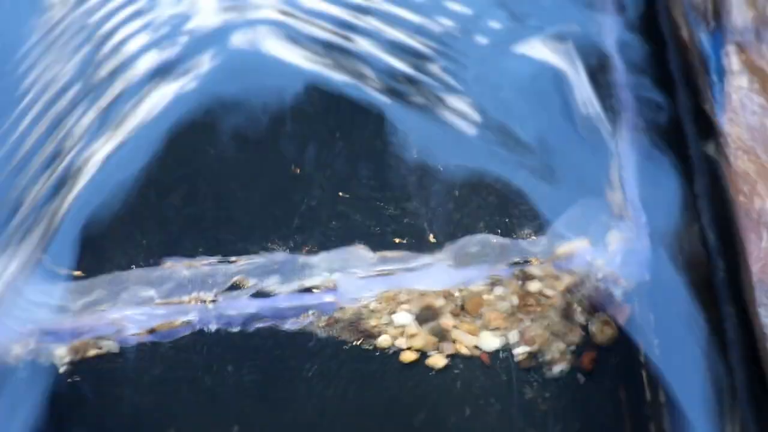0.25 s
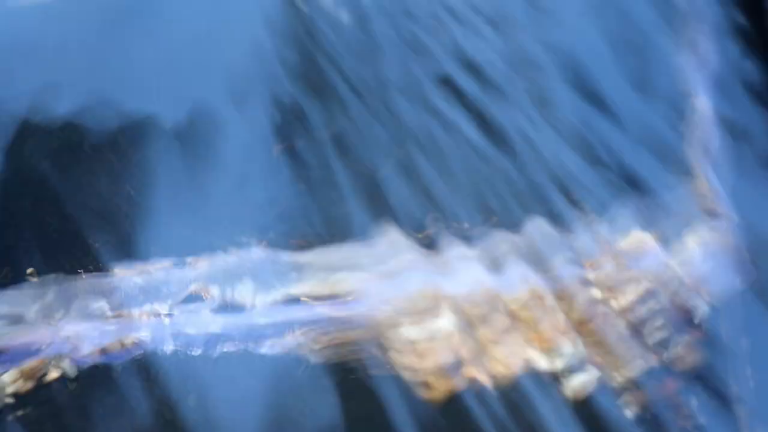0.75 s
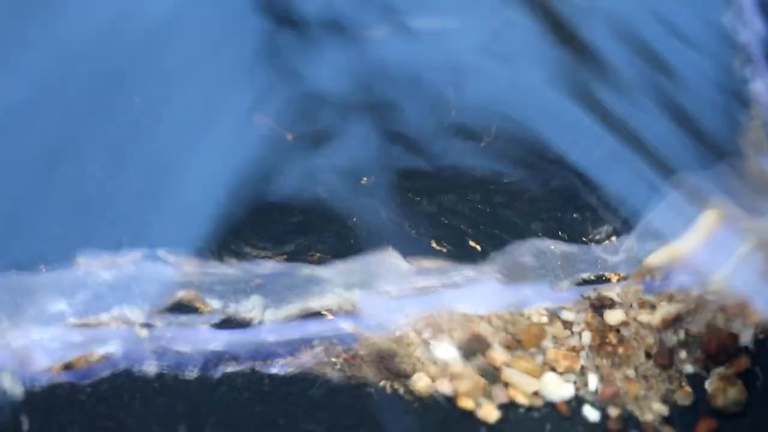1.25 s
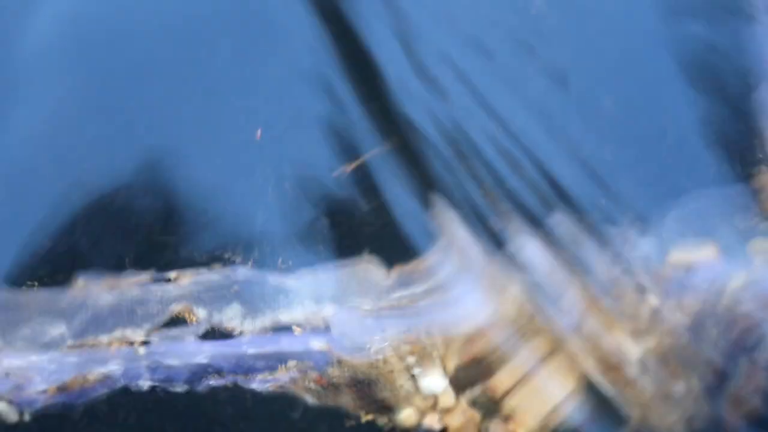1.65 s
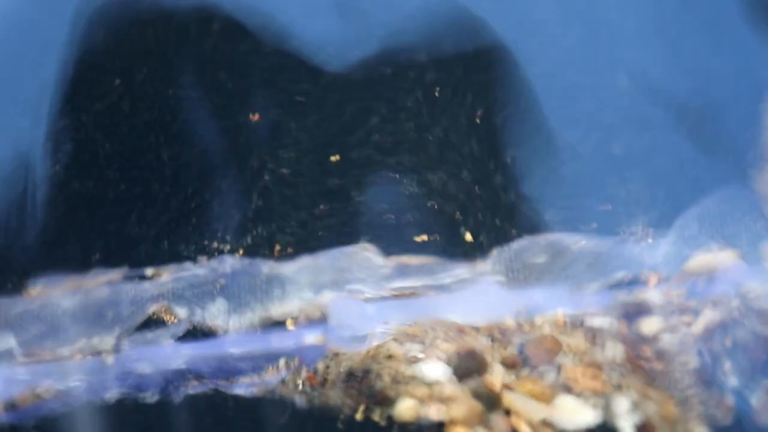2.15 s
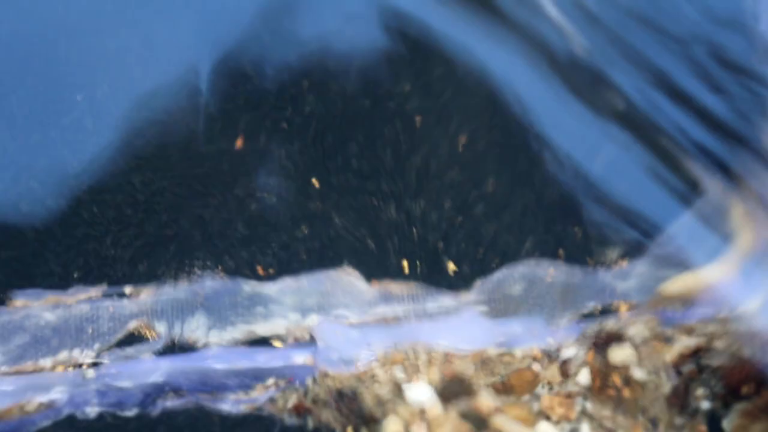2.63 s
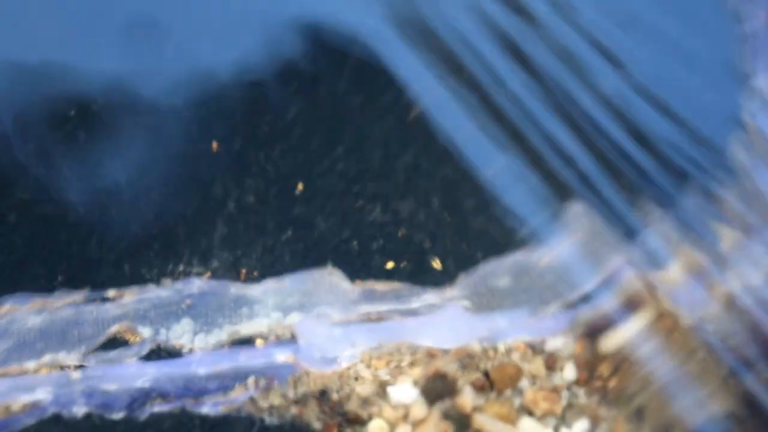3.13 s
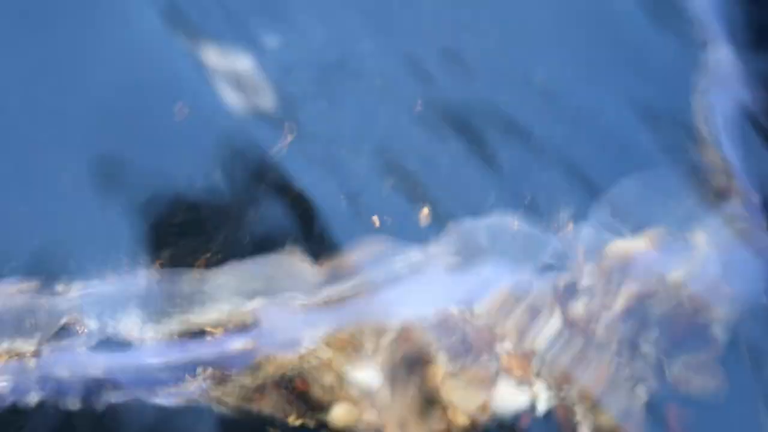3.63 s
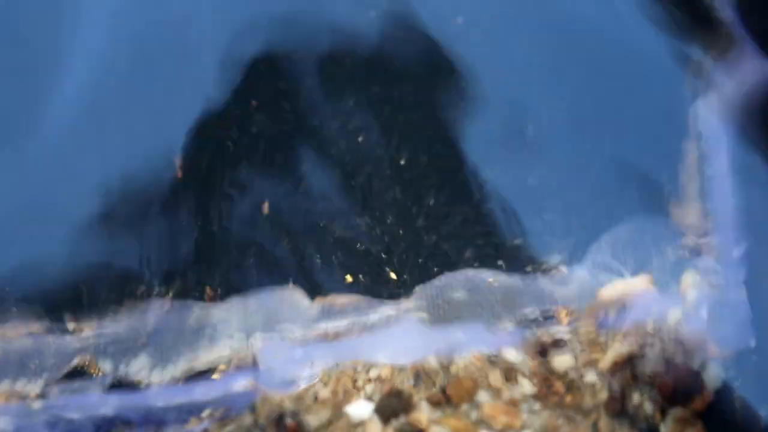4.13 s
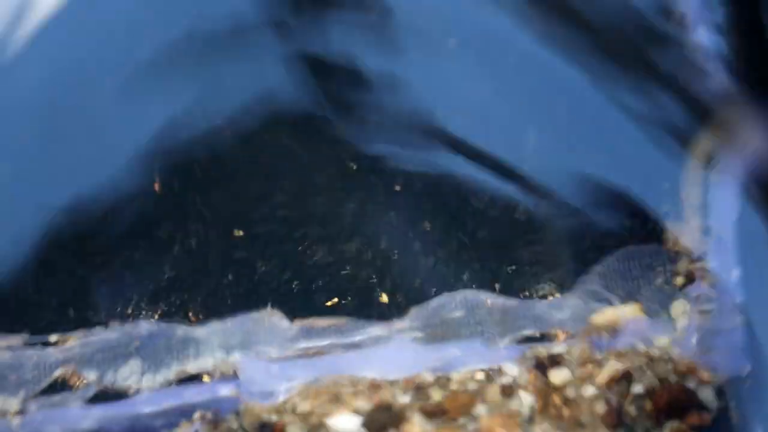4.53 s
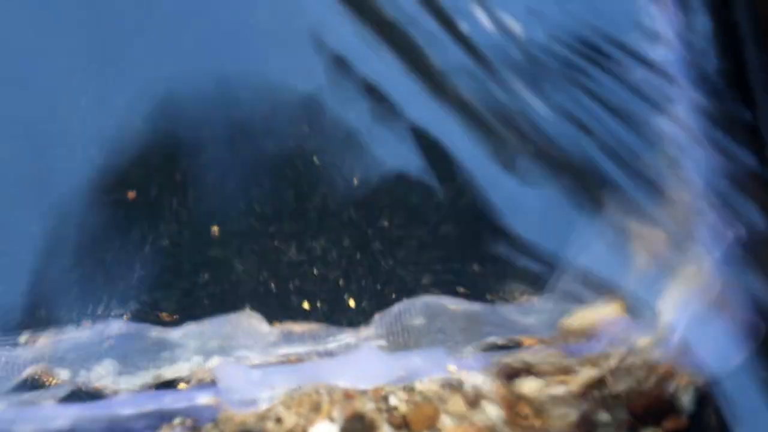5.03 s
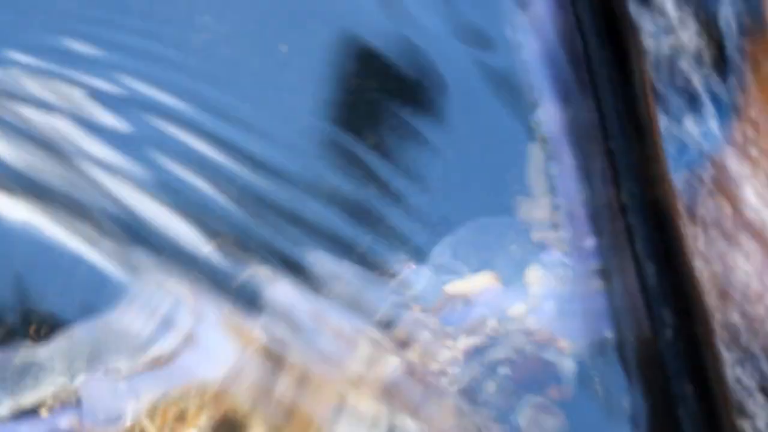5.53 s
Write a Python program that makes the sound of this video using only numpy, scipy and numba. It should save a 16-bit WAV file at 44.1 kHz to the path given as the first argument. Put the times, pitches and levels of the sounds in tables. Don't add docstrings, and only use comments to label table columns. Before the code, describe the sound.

Close, steady gurgling rush of river water through a sluice box, crowded with plinking bubbles, fizz and droplet ticks over soft hiss.

```python
import sys
import numpy as np
from scipy import signal
from scipy.fft import rfft, irfft, next_fast_len
from scipy.io import wavfile
from scipy.ndimage import uniform_filter1d, map_coordinates
from numba import njit

SR = 44100
rng = np.random.default_rng(int(sys.argv[2]) if len(sys.argv) > 2 else 0)


def pcm_store(signal):
    levels = np.round(np.clip(np.atleast_2d(signal), -1, 1) * 32767)
    wavfile.write(sys.argv[1], SR, levels.astype(np.int16).T)


def natural_amplitude(level_db):
    exponent = np.asarray(level_db, float) / 20
    return 10 ** exponent


N = 254765

# (time [s], peak level [dB], pitch [Hz], decay to 1/e [cycles])
RISING_BUBBLES = [(0.104, -23.5, 917, 7.3), (0.171, -16.5, 596, 3.1), (0.625, -20.5, 1067, 11),
                  (0.651, -29, 694, 17), (0.981, -19, 652, 9.4), (1.534, -25.5, 499, 4.8),
                  (1.549, -25, 660, 8.9), (2.017, -16.5, 1000, 3.3), (2.109, -23, 763, 11),
                  (2.168, -18, 796, 6), (2.204, -20.5, 1138, 13), (2.311, -25, 486, 9.1),
                  (2.348, -16.5, 807, 5.6), (2.385, -23.5, 574, 4.3), (2.828, -24, 605, 13),
                  (2.848, -17.5, 975, 3.1), (2.948, -31.5, 461, 25), (3.486, -15, 2480, 6.8),
                  (3.774, -19, 835, 3.3), (3.886, -21.5, 683, 12.4), (3.918, -22, 1570, 7.2),
                  (4.201, -21.5, 896, 6.3), (4.215, -21, 1910, 13), (4.226, -23, 774, 9.4),
                  (4.306, -22, 780, 5.3), (4.457, -20, 1245, 8.5), (4.625, -26.5, 1147, 14),
                  (5.217, -25, 1063, 7.1), (5.217, -20, 566, 1.8), (5.475, -22, 2200, 16)]
# (time [s], peak level [dB], pitch [Hz], decay [cycles])
HELD_BUBBLES = [(0.115, -28.5, 632, 18.5), (0.268, -22, 834, 8.6), (0.550, -21.5, 1123, 9.7),
                (0.798, -21, 740, 3.1), (1.082, -23.5, 579, 12), (1.182, -25.5, 541, 7.4),
                (1.242, -24, 567, 6.9), (1.530, -19.5, 1190, 7.2), (1.595, -18.5, 1364, 8),
                (2.075, -20, 1073, 9.9), (2.092, -20.5, 911, 12), (2.419, -21, 1220, 5.5),
                (2.434, -21.5, 535, 4.3), (2.839, -25, 804, 7.5), (1.010, -24, 1156, 4.5),
                (3.086, -20.5, 716, 6.1), (3.285, -21.5, 896, 9), (3.339, -22.5, 940, 8.1),
                (3.477, -23, 1216, 8.9), (3.708, -17, 1250, 5.5), (3.759, -16, 1210, 3.9),
                (4.064, -16, 755, 2.2), (4.408, -21.5, 1127, 9.2), (4.426, -17, 1424, 9.2),
                (4.648, -25, 1140, 7), (4.693, -24.5, 580, 5.5), (4.994, -21, 1230, 7.5),
                (5.010, -18, 875, 5.2), (5.313, -19, 1450, 9), (5.396, -22, 1080, 6)]
# (time [s], peak level [dB], pitch [Hz], decay [cycles])
GULPS = [(0.317, -25.5, 555, 4.7), (0.930, -35, 443, 10), (1.630, -27, 564, 11), (1.659, -35, 306, 4),
         (1.72, -36.5, 428, 8), (1.93, -36, 314, 5), (3.225, -33.5, 476, 15), (3.609, -26, 612, 7),
         (3.75, -33.5, 497, 7.6), (3.992, -37, 383, 13), (4.17, -36.5, 378, 8), (4.264, -34, 298, 2.2),
         (4.324, -31, 433, 9.8), (4.407, -36.5, 400, 11), (4.591, -36.5, 340, 8.7),
         (4.702, -28.5, 410, 8.8), (4.84, -31, 485, 6.7), (4.95, -38.5, 390, 6.3), (5.04, -35, 358, 6.4),
         (5.156, -39, 300, 6), (5.272, -35, 293, 2.6), (5.354, -33, 343, 6.7), (5.39, -36, 328, 6.6),
         (5.543, -36, 288, 10)]
# (time [s], peak level [dB], pitch [Hz], decay [cycles])
PLINKS = [(0.0437, -13, 2920, 4.9), (0.1964, -16, 3540, 3.6), (0.494, -14.5, 2130, 2.6),
          (0.585, -17.5, 1990, 12.5), (0.6584, -12, 2700, 2.9), (1.079, -14, 1620, 3.5),
          (1.1907, -17, 2310, 9), (1.345, -18, 1970, 3.2), (1.403, -20, 2300, 9.9), (3.479, -18, 2320, 5.4),
          (1.8144, -15, 2420, 1), (2.08, -13, 3460, 1.8), (2.3115, -17.5, 2560, 7), (2.6552, -15, 2600, 4),
          (2.6746, -21.5, 3370, 6), (3.026, -16.5, 1790, 6), (3.0636, -13, 3650, 1.8),
          (3.184, -17.5, 2230, 8.1), (3.5024, -15, 3640, 2.4), (3.5158, -17.5, 3740, 5.4),
          (4.1188, -23, 2770, 6.5), (4.1903, -8.5, 1760, 0.6), (4.5803, -10, 2825, 7.1),
          (4.9944, -14, 1970, 2.7), (5.094, -12.5, 2790, 4.6), (5.1134, -23, 1910, 5.2),
          (5.1648, -16.5, 1730, 5.3), (5.2105, -17.5, 2850, 5.9), (5.3446, -17.5, 2580, 7),
          (5.6637, -17, 3550, 8)]
# (time [s], peak level [dB], pitch [Hz])
SNAPS = [(0.0773, -18, 4600), (0.2393, -23.5, 5200), (0.998, -15, 4540), (0.505, -19, 5040),
         (0.7695, -15.5, 4000), (1.0025, -9.5, 4680), (1.1548, -13, 4200), (1.295, -16.5, 4360),
         (1.8143, -17, 4260), (2.484, -17.5, 4570), (2.5897, -26, 5500), (3.1618, -17, 4800),
         (3.3473, -19, 4680), (3.649, -16, 4850), (3.707, -16.5, 3700), (3.9504, -21, 5240),
         (4.2765, -22, 4680), (4.294, -19, 4430), (4.3628, -21.5, 3830), (4.5369, -19, 4400),
         (4.5738, -21, 4860), (4.6177, -15, 4600), (4.7368, -12.5, 3570), (4.9291, -16.5, 4630),
         (5.1751, -20.5, 3740), (5.2498, -18.5, 4470), (5.3678, -15, 4080), (5.494, -13.5, 4630),
         (5.5797, -16, 4400), (5.6862, -21, 4960)]
# (time [s], peak
# level [dB], pitch [Hz])
SPITS = [(0.3127, -24, 7200), (0.3265, -23, 10210), (0.5301, -26, 8040), (0.5518, -20, 9900),
         (0.708, -21, 6900), (1.0658, -32, 9100), (1.698, -30, 8240), (2.0912, -20, 10730),
         (2.2756, -28, 13040), (3.4824, -19, 8200), (3.6424, -25, 9400), (3.6649, -29, 8500),
         (3.8123, -24, 6700), (4.0557, -24.5, 8500), (4.1562, -21, 9400), (4.4873, -18, 7060),
         (4.6171, -26, 8550), (4.958, -19, 6450), (5.3972, -15, 8820), (0.925, -28, 9000),
         (4.8368, -33, 13000), (4.9117, -26, 13040), (3.678, -27, 10300), (1.398, -26, 6560)]
# (time [s], level [dB])
FLOW = [(0.0, -30.5), (0.37, -32), (0.71, -30.5), (1.24, -31), (2.01, -32), (2.23, -31), (2.66, -32),
        (3.07, -31), (3.43, -32.5), (3.83, -30.5), (4.95, -32), (5.07, -31), (5.78, -32)]
# (pitch [Hz], level [dB])
SWARM_STRENGTH = [(300, -17.5), (500, -2), (900, 7), (1300, 6), (1800, -4), (2500, 4), (4000, -1),
                  (6000, -5), (9000, -10), (14000, -15)]
# (frequency [Hz], level [dB])
TICK_COLOUR = [(500, -33), (2000, 13), (4000, -9), (8000, -6.5), (15000, -9.5)]
# (frequency [Hz], level [dB])
TROUGH_COLOUR = [(120, -20.5), (250, -17.5), (360, -0.5), (2900, -2), (3450, 4.5), (4150, -1.5), (4900, 4),
                 (6000, 0.5)]
# (frequency [Hz], density [dB per Hz])
HISS_COLOUR = [(150, -49), (250, -46), (392, -13.5), (545, -4.5), (900, 0.5), (1210, 1), (1770, -8.5),
               (2250, -6), (3350, -8), (4130, -16.5), (4910, -15), (6590, -26.5), (13400, -35),
               (15700, -61)]
# (frequency [Hz], density [dB per Hz])
RUMBLE_COLOUR = [(10, -18), (25, -0.5), (36, -5), (58, -14.5), (95, -6), (150, -15), (250, -14.5),
                 (320, -17), (500, -120)]
# (time [s], level [dB])
RIVER_SWELL = [
    (0.0, -62.5),
    (0.63, -64),
    (1.14, -62),
    (1.3, -63.5),
    (5.78, -59),
]
# (centre [Hz], width [Hz], level [dB])
DRONES = [
    (12.3, 9.5, -50),
    (121.5, 20, -65.5),
]

RISE_GLIDE, HELD_GLIDE, GULP_GLIDE, PLINK_GLIDE, SNAP_GLIDE = 0.26, -0.022, 0.0585, -0.06, -0.069
RISE_AT_HZ, RISE_FALLS = 805, 0.5
LARGE_SOFT, PLINK_SOFT, SNAP_SOFT = 0.21, 0.093, 0.29
SNAP_CYCLES, SNAP_AT_DB, SPIT_AT_DB = 3.4, -18, -26.5
LONGER_PER_DB = 0.5
GURGLE_DB, FIZZ_DB, FROTH_DB, SPRAY_DB, HISS_DB = -36.5, -36, -51.5, -46, -36.5
FIZZ_GROWS, SPRAY_GROWS = 0.73, 0.94
CLEAR_DB, RUMBLE_DB = -3, 5


def clear_bubbles():
    pitch = np.transpose(RISING_BUBBLES)[2]
    climb = RISE_GLIDE * (RISE_AT_HZ / pitch) ** RISE_FALLS
    large = kind(RISING_BUBBLES, climb, LARGE_SOFT)
    large = large + kind(HELD_BUBBLES, HELD_GLIDE, LARGE_SOFT)
    large = large + kind(GULPS, GULP_GLIDE, LARGE_SOFT)
    middle = kind(PLINKS, PLINK_GLIDE, PLINK_SOFT)
    small = kind(SNAPS, SNAP_GLIDE, SNAP_SOFT, SNAP_AT_DB)
    small = small + kind(SPITS, SNAP_GLIDE, SNAP_SOFT, SPIT_AT_DB)
    return large + middle + small


def kind(rows, glide, softness, usual_db=None):
    s, db, hz, *listed = np.transpose(rows)
    if listed:
        life = listed[0]
    else:
        life = SNAP_CYCLES * natural_amplitude(LONGER_PER_DB * (usual_db - db))
    return ring(s, db, hz, life, glide + 0 * s, softness)


def ring(s, db, hz, life, glide, softness):
    crest = softness * np.log(1 + 1 / softness)
    top = (1 - np.exp(-crest / softness)) * np.exp(-crest)
    return rung(N, s * SR, natural_amplitude(db) / top, hz / SR, life, glide, softness * life)


@njit
def rung(length, start, size, cycle, life, glide, rise):
    out = np.zeros(length)
    for k in range(len(start)):
        first = int(start[k]) + 1
        last = min(length, first + int(5 * life[k] / cycle[k]))
        for i in range(first, last):
            turns = (i - start[k]) * cycle[k]
            swell = (1 - np.exp(-turns / rise[k])) * np.exp(-turns / life[k])
            bend = 1 + glide[k] * min(turns / life[k], 6.) / 2
            out[i] += size[k] * swell * np.sin(2 * np.pi * turns * bend)
    return out


def swarm(low_hz, high_hz, count, spread_db, cycles, clumps_db, climb, tumble):
    u = rng.random((count, 6))
    s = moments(u[:, 0], clumps_db, tumble)
    hz = low_hz * (high_hz / low_hz) ** u[:, 1]
    db = along(SWARM_STRENGTH, hz) + spread_db * np.minimum(-np.log(1 - u[:, 2]), 2.4)
    life = cycles * 5 ** (u[:, 3] - 0.5)
    glide = -0.07 + climb * u[:, 4] ** 2
    softness = 0.095 + 0.46 * u[:, 5]
    return unit(ring(s, db, hz, life, glide, softness))


def spray(count, spread_db, clumps_db, tumble):
    u = rng.random((count, 2))
    size = natural_amplitude(spread_db * np.minimum(-np.log(1 - u[:, 1]), 3.2))
    start = (moments(u[:, 0], clumps_db, tumble) * SR).astype(int)
    blows = np.bincount(start, size, N)[:N]
    burst = natural_amplitude(-60 * np.arange(256) / SR / 0.0028)
    ticks = signal.fftconvolve(blows, burst)[:N] * rng.standard_normal(N)
    return unit(filtered(ticks, lambda hz: causal(TICK_COLOUR, hz)))


def moments(chance, clumps_db, tumble):
    density = np.cumsum(natural_amplitude(clumps_db * tumble))
    return np.interp(chance, density / density[-1], np.arange(N) / SR)


def walls(x, t60, db):
    size = SR // 20
    t = np.arange(size) / SR
    pieces = np.pad(x, (0, -N % size)).reshape(-1, size)
    tails = rng.standard_normal(pieces.shape) * natural_amplitude(-60 * t / t60) * (t > 0.0012)
    tails = tails / np.linalg.norm(tails[0])
    echo = np.pad(signal.fftconvolve(pieces, tails, axes=1), ((0, 0), (0, 1)))
    echo = echo[:, :size].ravel() + np.roll(echo[:, size:].ravel(), size)
    return filtered(x + natural_amplitude(db) * echo[:N], lambda hz: causal(TROUGH_COLOUR, hz))


def rush(spectrum, patchy_db):
    z = signal.stft(rng.standard_normal(N + 512), nperseg=256)[2]
    field = uniform_filter1d(rng.standard_normal(z.shape), size=5, axis=0)
    field = uniform_filter1d(field, size=5, axis=1)
    noise = signal.istft(z * natural_amplitude(patchy_db * unit(field)), nperseg=256)[1][:N]
    return unit(filtered(noise, lambda hz: natural_amplitude(along(spectrum, hz))))


def drone(centre, width):
    noise = rng.standard_normal(N)
    return unit(filtered(noise, lambda hz: 1 / (1 + (2 * (hz - centre) / width) ** 2)))


def river(rumble_db):
    drones = sum(natural_amplitude(db) * drone(centre, width) for centre, width, db in DRONES)
    return natural_amplitude(rumble_db) * rush(RUMBLE_COLOUR, patchy_db=-2.0) + drones


def unit(x):
    return x / np.sqrt(np.mean(x ** 2) + 1e-20)


def along(points, hz):
    f, v = np.transpose(points)
    return np.interp(np.log(hz + 1), np.log(f + 1), v)


def curve(rows):
    return np.interp(np.arange(N) / SR, *np.transpose(rows))


def wobble(rate):
    knots = rng.standard_normal(int(N * rate / SR) + 4)
    return map_coordinates(knots, [np.arange(N) * rate / SR])


def filtered(x, response):
    m = next_fast_len(N + 8192)
    return irfft(rfft(x, m) * response(np.fft.rfftfreq(m, 1 / SR)), m)[:N]


def causal(points, hz):
    ceps = irfft(np.log(natural_amplitude(along(points, hz)) + 1e-6))
    half = len(ceps) // 2
    folded = np.r_[ceps[0], 2 * ceps[1:half], np.zeros(len(ceps) - half)]
    return np.exp(rfft(folded))


def scene():
    flow_db = curve(FLOW) - curve(FLOW).mean()
    tumble = wobble(130)
    gurgle = swarm(299.8, 1502.0, count=1800, spread_db=2.5, cycles=5.94, clumps_db=3, climb=0.308,
                   tumble=wobble(40))
    fizz = swarm(1504, 6056, count=3800, spread_db=3.0, cycles=4.0, clumps_db=5.5, climb=0.137,
                 tumble=tumble)
    froth = swarm(5760, 15900, count=5000, spread_db=6.5, cycles=4.3, clumps_db=4, climb=0.197,
                  tumble=tumble)
    ticks = spray(count=2800, spread_db=6.5, clumps_db=4.5, tumble=tumble)
    near = natural_amplitude(CLEAR_DB) * clear_bubbles()
    near = near + natural_amplitude(GURGLE_DB + flow_db) * gurgle
    near = near + natural_amplitude(FIZZ_DB + FIZZ_GROWS * flow_db) * fizz
    near = near + natural_amplitude(SPRAY_GROWS * flow_db) * (natural_amplitude(FROTH_DB) * froth + natural_amplitude(SPRAY_DB) * ticks)
    hiss = natural_amplitude(HISS_DB + flow_db) * rush(HISS_COLOUR, patchy_db=2.0)
    far = river(curve(RIVER_SWELL) + RUMBLE_DB)
    return (walls(near, t60=0.044, db=-11.0) + hiss + far)[None]


def roll_off(x):
    return signal.sosfilt(signal.butter(12, 15810, fs=SR, output="sos"), x)


def record(dry):
    faded = filtered(dry[0], lambda hz: np.clip((15800 - hz) / 650, 0, 1) ** 0.5)
    return roll_off(faded[None])


dry = scene()
out = record(dry)
pcm_store(out)
```